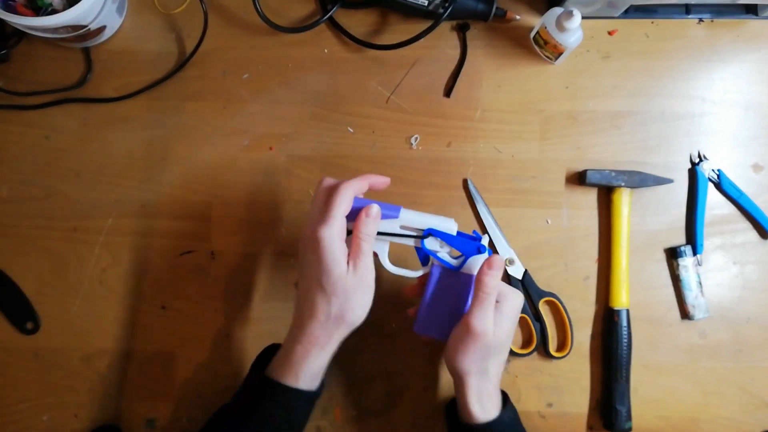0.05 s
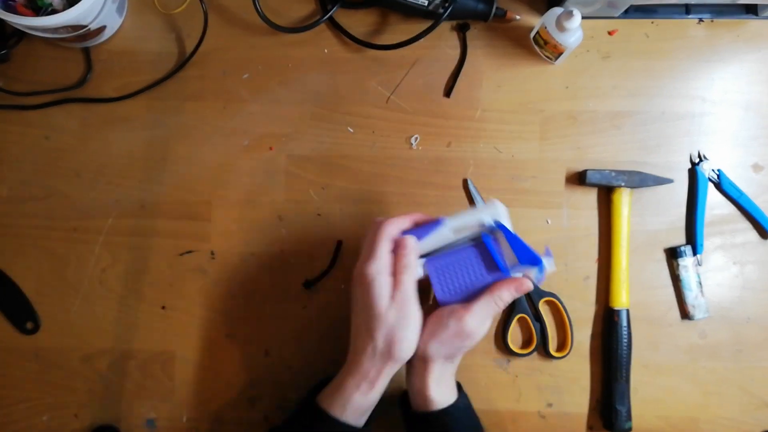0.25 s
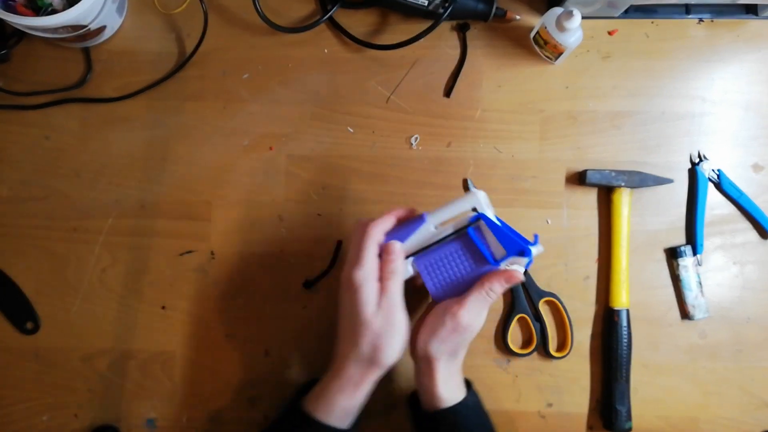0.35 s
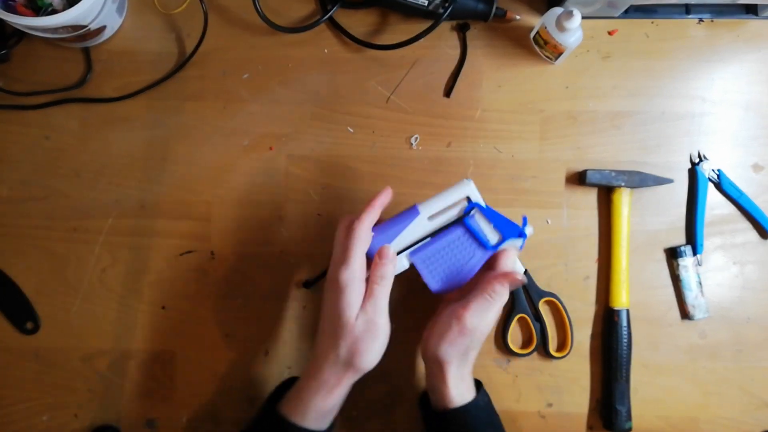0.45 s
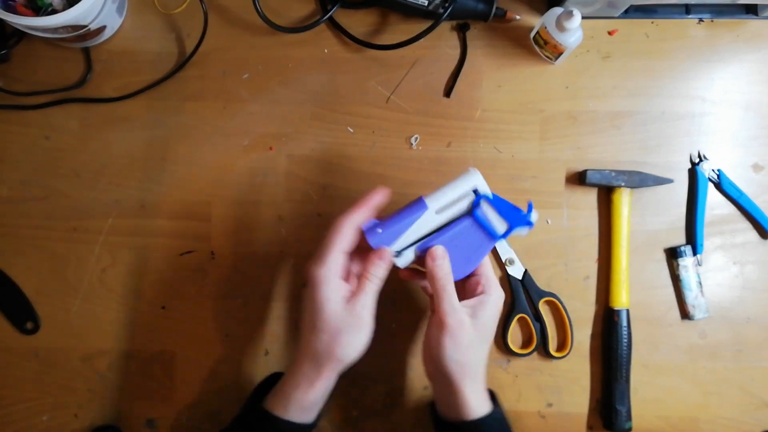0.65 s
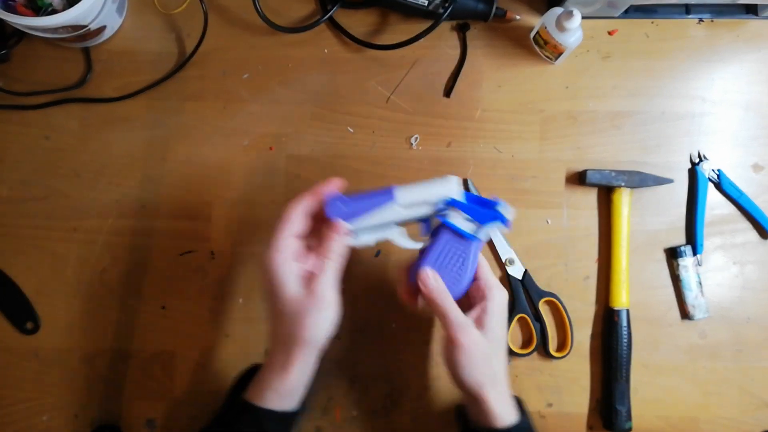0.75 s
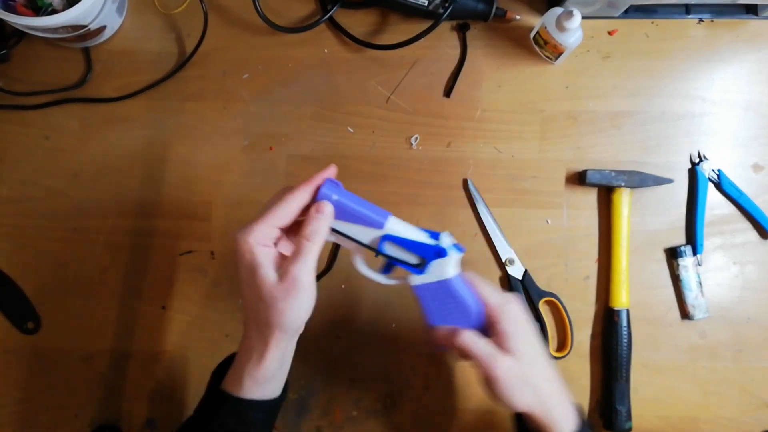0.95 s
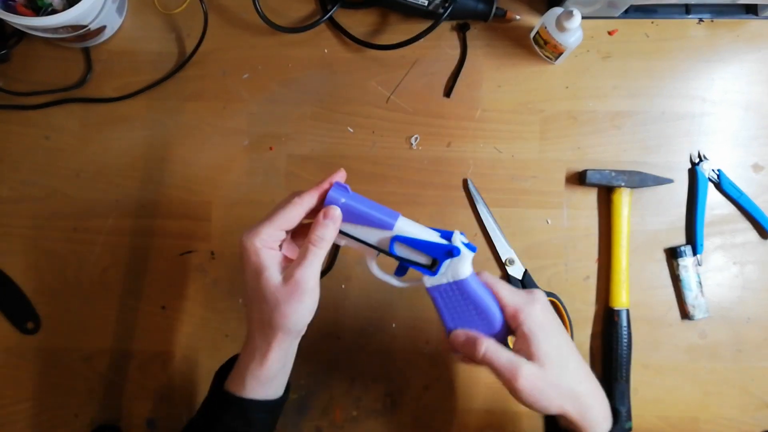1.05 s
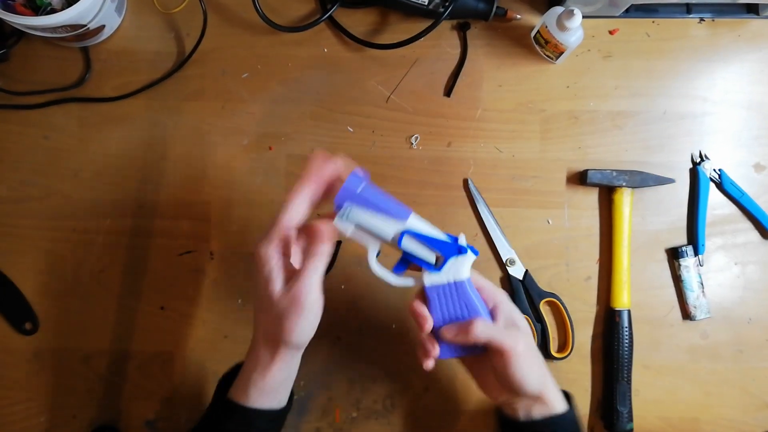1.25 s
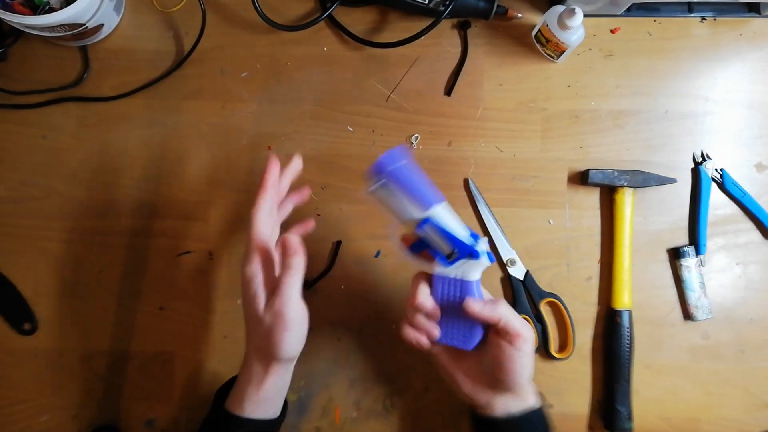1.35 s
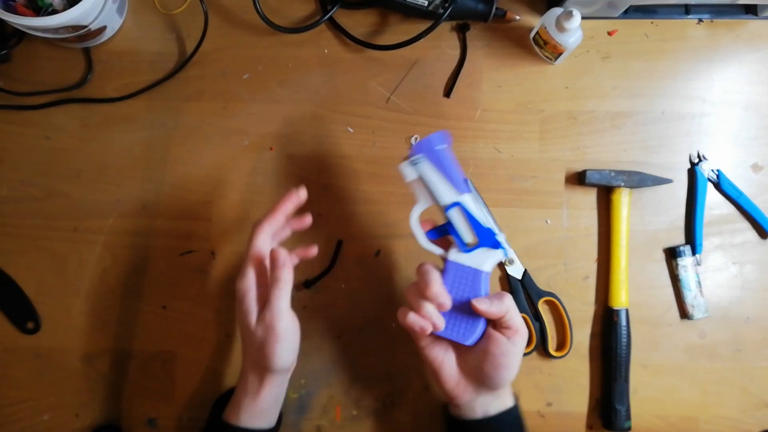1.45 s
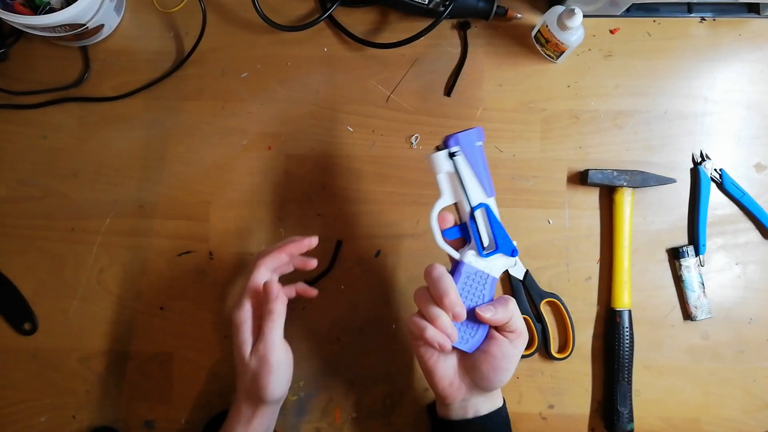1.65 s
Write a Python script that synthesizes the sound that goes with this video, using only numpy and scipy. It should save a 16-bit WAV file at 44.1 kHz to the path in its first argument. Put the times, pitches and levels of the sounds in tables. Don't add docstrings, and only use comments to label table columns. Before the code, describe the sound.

Hollow plastic pistol handled up close: a ridged scrape, bright snap open, then two sharp closing clacks

```python
import sys
import numpy as np
from scipy import signal
from scipy.fft import rfft, irfft
from scipy.io import wavfile
from scipy.ndimage import uniform_filter1d

SR = 44100
rng = np.random.default_rng(int(sys.argv[2]) if len(sys.argv) > 2 else 0)


def wrap_up_sound(samples):
    columns = np.atleast_2d(samples).T
    tamed = np.clip(columns, -1, 1)
    steps = np.round(tamed * 32767).astype(np.int16)
    wavfile.write(sys.argv[1], SR, steps)


def voltage_ratio(decibels):
    exponent = np.asarray(decibels, float) / 20
    return 10 ** exponent


N = 74970

# frequency in Hz, bandwidth in Hz, level in dB.
SHUT_SHELL = [(1900, 130, -11), (2330, 220, -11), (3350, 400, -27), (3573, 570, 14.5), (4960, 970, 10),
              (5560, 730, -23), (6600, 900, 7.5), (8280, 2770, 9), (9800, 790, 2.5), (10300, 300, -14),
              (12600, 2200, -25), (15000, 1700, -20)]
SHUT_SMALL_HZ = 1780


def evened(x):
    return x / np.sqrt(np.mean(x ** 2) + 1e-20)


def read(points, hz):
    f, value = np.transpose(points)
    return np.interp(np.log(hz + 1), np.log(f + 1), value)


def add(mix, s, sound):
    part = mix[round(s * SR):][:len(sound)]
    part += sound[:len(part)]


def above(x, hz, order):
    return signal.sosfilt(signal.butter(order, hz, "high", fs=SR, output="sos"), x)


def ring(hz, t60, size=1500):
    t = np.arange(size) / SR
    return voltage_ratio(-60 * t / t60) * np.sin(2 * np.pi * hz * t)


def noise(points, patchy_db):
    # frequency in Hz, left-right coherence from 0 to 1.
    coherence = [(30, 0.86), (70, 0.88), (150, 0.85), (300, 0.28), (700, 0.017), (1500, 0.17),
                 (4000, 0.033), (12000, 0.074)]
    frames, hz = N // 256 + 5, np.fft.rfftfreq(1024, 1 / SR)
    a, b, c, d, patches = rng.standard_normal((frames, 513, 5)).T
    patches = uniform_filter1d(patches, size=10, axis=0)
    patches = evened(uniform_filter1d(patches, size=8, axis=1))
    same = np.clip(read(coherence, hz), -1, 1)[:, None]
    left, other = a + 1j * b, c + 1j * d
    z = np.array([left, same * left + np.sqrt(1 - same ** 2) * other])
    z *= voltage_ratio(read(points, hz)[:, None] + patchy_db * patches)
    return evened(signal.istft(z, nperseg=1024, noverlap=768)[1][:, :N])


def background():
    # frequency in Hz, density in dB per Hz.
    hiss_curve = [(410, -39), (700, -5.5), (1710, 1), (2130, -7), (3070, -5.5), (3840, -5.5), (4490, -9),
                  (9110, -7), (16000, -25.5)]
    rumble_curve = [(20, -46), (45, -6.5), (70, -11), (125, -13), (260, -13.5), (330, -10), (550, -14),
                    (800, -19), (1100, -77)]
    # frequency in Hz, rms level in dB.
    tones = [(49.5, -71.5), (15003, -72)]
    # start in seconds, level in dB, frequency in Hz, t60 in seconds.
    s, db, knock_hz, t60 = (1.525, -57, 132, .3)
    t = np.arange(N) / SR
    earlier_tail = voltage_ratio(-45.5 - 60 * t / 0.14)
    hiss = noise(hiss_curve, patchy_db=2.0) * (voltage_ratio(-51.5) + earlier_tail)
    rumble = voltage_ratio(-67.5) * noise(rumble_curve, patchy_db=0.0)
    onset = np.minimum(np.arange(6000) / (0.02 * SR), 1)
    modes = ring(knock_hz, t60, size=6000) + ring(knock_hz * 1.37, t60, size=6000)
    knock = np.zeros(N)
    add(knock, s, voltage_ratio(db) * modes * onset)
    whine = sum(np.sqrt(2) * voltage_ratio(db) * np.sin(2 * np.pi * hz * t) for hz, db in tones)
    return hiss + rumble + knock + whine * np.array([[1], [.8]])


def causal(gain):
    log_gain = np.log(np.maximum(np.r_[gain, gain[-2:0:-1]], 1e-5))
    return np.fft.ifft(np.exp(np.conj(signal.hilbert(log_gain)))).real[:1500]


def shell(modes, small_hz):
    skirt, bright_hz = 1.36, 2800
    f = np.fft.rfftfreq(4096, 1 / SR)
    power = np.array([voltage_ratio(2 * db) / (1 + (2 * (f - hz) / w) ** 2) ** skirt for hz, w, db in modes])
    upper = np.array([hz > bright_hz for hz, w, db in modes])
    both = np.array([causal(np.sqrt(power[part].sum(0))) for part in (~upper, upper)])
    return above(both / np.linalg.norm(both), small_hz, order=4)


def clicks(rows, modes, small_hz):
    blow, ring_cycles = 0.94, 14.9
    out, u = np.zeros(N), np.arange(600) / SR
    whole_shell = shell(modes, small_hz).sum(0)
    for s, db, hz, ring_db, length in rows:
        force, contact = rng.standard_normal((2, 600))
        touching = abs(contact) > 1
        chatter = force * touching * (u / length) * np.exp(-4 * u / length)
        chatter[round(length / 5 * SR)] += blow * abs(chatter).max()
        crack = np.convolve(chatter, whole_shell)
        tone = np.convolve(chatter, above(ring(hz, ring_cycles / hz), 0.7 * hz, order=4))
        add(out, s, voltage_ratio(db) * (crack / abs(crack).max() + voltage_ratio(ring_db) * tone / abs(tone).max()))
    return out


def ticks():
    # start in seconds, crack peak in dB, ring in Hz, ring over crack in dB, chatter in seconds.
    contacts = [
        (.003, -70, 1730, 0.19, 0.0054),
        (.759, -50, 12000, 18.4, 0.0056),
        (1.184, -40.5, 3400, 0.1, 0.006),
        (1.302, -53, 3640, 7.9, 0.0026),
        (1.347, -49, 4270, 3, 0.0035),
        (1.41, -56.5, 1790, 4.9, 0.012),
    ]
    return clicks(contacts, SHUT_SHELL, SHUT_SMALL_HZ)


def bench(x):
    # delay in seconds, level in dB.
    echoes = [(.0009, -5), (.0021, -7), (.0034, -16), (.0068, -10.5)]
    taps = np.zeros((2, 800))
    taps[0, 1], taps[1, 0] = 1, 1
    for (s, db), skew in zip(echoes, rng.integers(-8, 9, len(echoes))):
        taps[0, round(s * SR)] = voltage_ratio(db)
        taps[1, round(s * SR) + skew] = voltage_ratio(db)
    return signal.oaconvolve(x[None], taps, axes=1)[:, :N]


def room(x):
    # frequency in Hz, t60 in seconds.
    decay = [(500, 0.4), (1200, 0.67), (2500, 0.56), (5000, 0.63), (9000, 0.42), (14000, 0.34)]
    # frequency in Hz, level in dB.
    colour = [(500, 9), (1200, 1.5), (3000, -1.5), (7000, -2), (14000, -3)]
    # frequency in Hz, left-right coherence of the tail from 0 to 1.
    coherence = [(800, 0.23), (1400, 0.2), (2800, 0.13), (5000, 0.042), (12000, .05)]
    taps = np.zeros((2, SR))
    slots = np.arange(300, SR - 12, 12)
    at = slots + rng.integers(0, 12, (2, len(slots)))
    np.put_along_axis(taps, at, rng.choice([-1., 1.], at.shape), 1)
    hz, t, z = signal.stft(taps, SR, nperseg=256)
    same = np.clip(read(coherence, hz), 0, 1)[:, None]
    z[1] = same * z[0] + np.sqrt(1 - same ** 2) * z[1]
    fall_db = read(colour, hz)[:, None] - 60 * t / read(decay, hz)[:, None]
    tail = signal.istft(z * voltage_ratio(fall_db), SR, nperseg=256)[1]
    return signal.fftconvolve(x[None], tail / np.linalg.norm(tail[0]), axes=1)[:, :N]


def rasp(slide, modes, small_hz):
    slips_per_s, spread_db = 6500, 0.5
    s, db, bright_db = np.transpose(slide)
    t = np.arange(N) / SR
    slipping = rng.random(N) < slips_per_s / SR
    strength = voltage_ratio(spread_db * np.minimum(rng.exponential(1, N), 3))
    slips = evened(slipping * strength * rng.choice([-1., 1.], N))
    slips = slips * voltage_ratio(np.interp(t, s, db, -200, -200))
    dull, bright = signal.oaconvolve(slips[None], shell(modes, small_hz), axes=1)[:, :N]
    return dull + voltage_ratio(np.interp(t, s, bright_db)) * bright


def opening():
    # start in seconds, crack peak in dB, ring in Hz, ring over crack in dB, chatter in seconds.
    catches = [
        (.184, -28, 1900, -15, 0.0036),
        (.204, -25, 2030, -4, 0.0067),
        (.224, -23, 2265, 4, 0.013),
        (.2485, -2.5, 9700, -3.5, 0.0045),
        (.269, -10, 1950, -4, 0.00972),
    ]
    # time in seconds, rasp in dB, brightness in dB.
    slide = [
        (.16, -41, -16),
        (.185, -34, -15),
        (.22, -28, -1.5),
        (.24, -34, 6),
        (.27, -17.5, -2.5),
        (.29, -38.5, -8),
        (.32, -72, -17),
    ]
    # frequency in Hz, bandwidth in Hz, level in dB.
    modes = [(1147, 530, -4.5), (1600, 250, -8), (1950, 130, -17), (2226, 320, 4), (3070, 290, 0),
             (3820, 650, 8.5), (5180, 1200, 2), (5900, 700, -1), (6840, 1400, 6.5), (8370, 1000, 5),
             (9700, 1000, 8), (12000, 1500, -31), (14900, 1500, -1.5)]
    small_hz = 950
    return clicks(catches, modes, small_hz) + rasp(slide, modes, small_hz)


def shutting():
    # start in seconds, crack peak in dB, ring in Hz, ring over crack in dB, chatter in seconds.
    catches = [
        (.7412, -38.5, 1920, 6, 0.002),
        (.7945, -40.5, 2060, 9.5, 0.0026),
        (.8125, -26, 1757, 0.5, 0.0017),
        (.870, -41, 3800, 8, .005),
        (.885, -27, 3755, 8.5, 0.01),
        (.9086, -8.5, 8840, 0, .006),
        (.9748, -45.5, 1415, 11.5, .003),
    ]
    latch = [
        (.9745, -5.5, 9470, -4, .003),
    ]
    # time in seconds, rasp in dB, brightness in dB.
    slide = [
        (.74, -51, 0),
        (.8, -46.5, -5),
        (.82, -39, 3),
        (.86, -44, 6.5),
        (.9, -28, 0),
        (.94, -36, 1),
        (.97, -62, -24),
        (1.02, -52, 19),
        (1.06, -73, -7),
    ]
    impacts = clicks([*catches, *latch], SHUT_SHELL, SHUT_SMALL_HZ)
    return impacts + rasp(slide, SHUT_SHELL, SHUT_SMALL_HZ)


def scene():
    # frequency in Hz, left over right in dB.
    balance = [(500, -1), (1200, -2), (2500, -2.1), (5000, -2.2), (9000, 2), (14000, 0.5)]
    pistol = ticks() + opening() + shutting()
    pistol = signal.sosfilt(signal.butter(4, 13360, fs=SR, output="sos"), pistol)
    heard = bench(pistol) + room(pistol)
    lean = read(balance, np.fft.rfftfreq(N, 1 / SR)) / 2
    return irfft(rfft(heard) * voltage_ratio([lean, -lean]), N) + background()


def top_cut(x):
    return signal.sosfilt(signal.butter(12, 16480, fs=SR, output="sos"), x)


def record(dry):
    return top_cut(dry)


dry = scene()
out = record(dry)
wrap_up_sound(out)
```